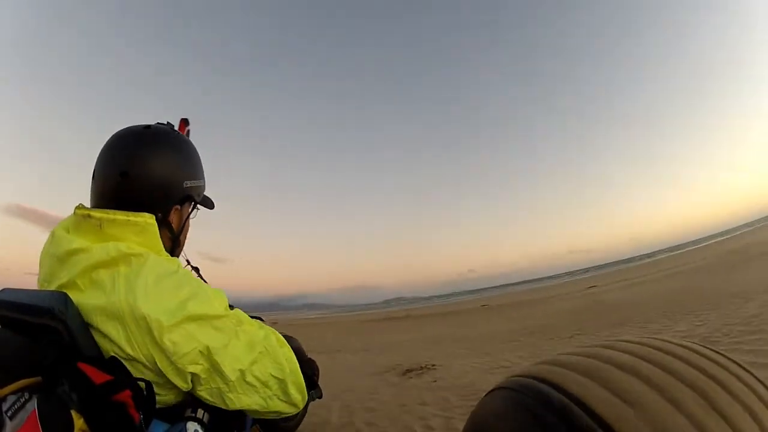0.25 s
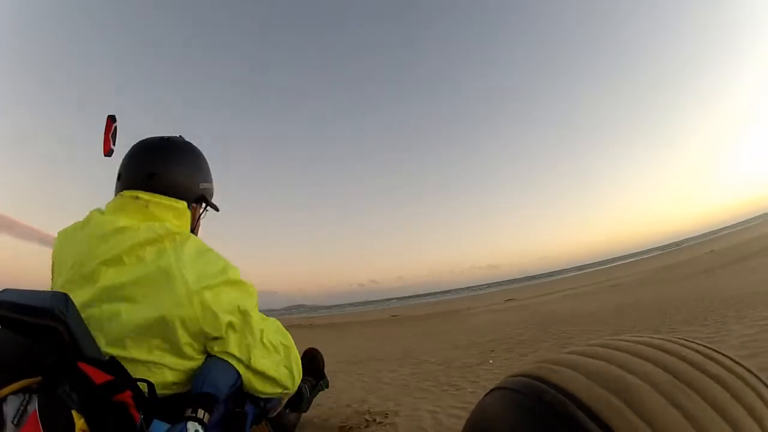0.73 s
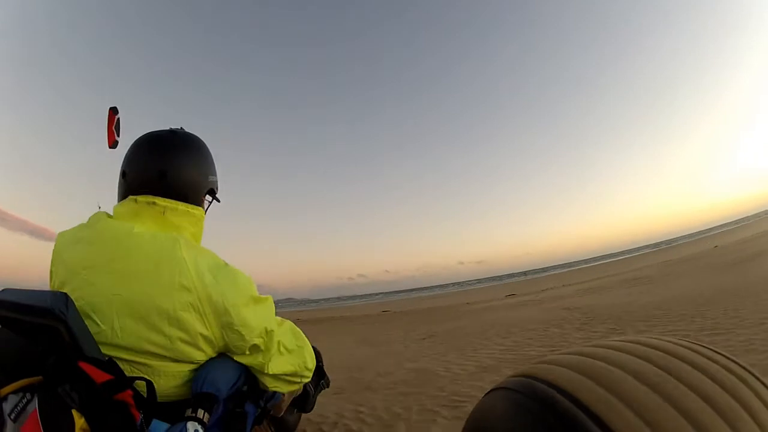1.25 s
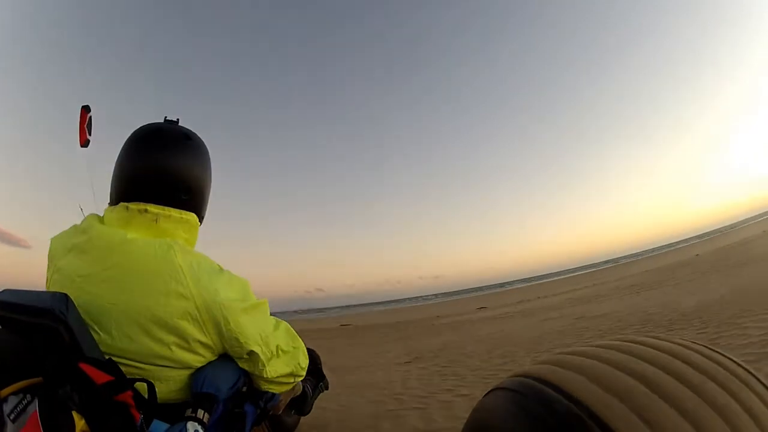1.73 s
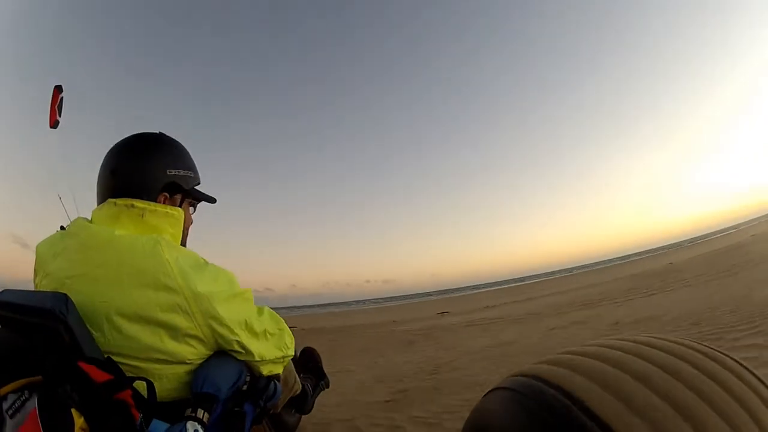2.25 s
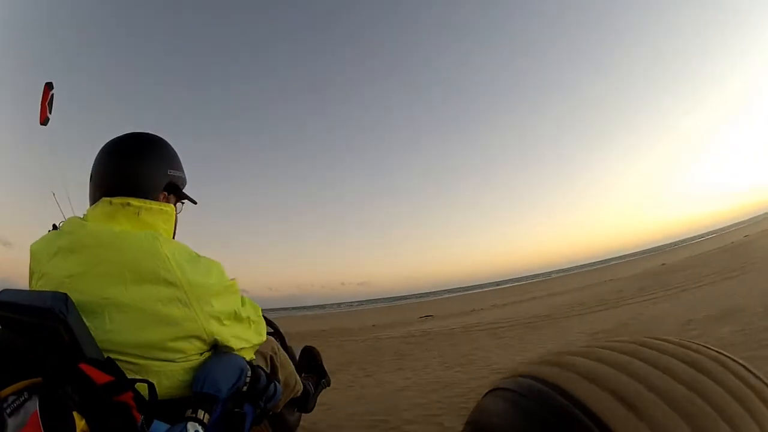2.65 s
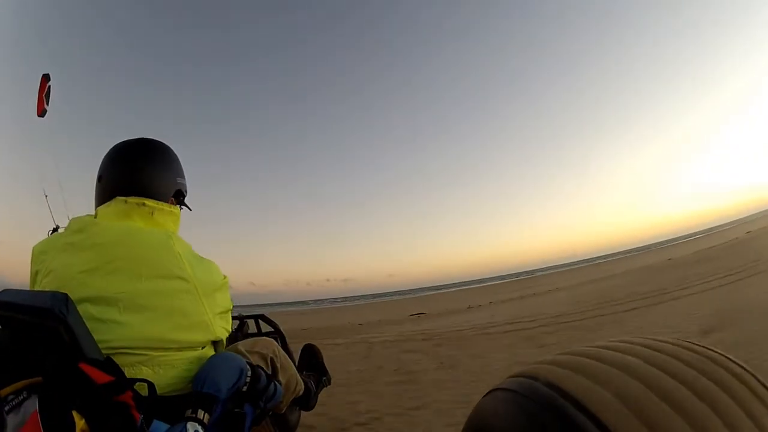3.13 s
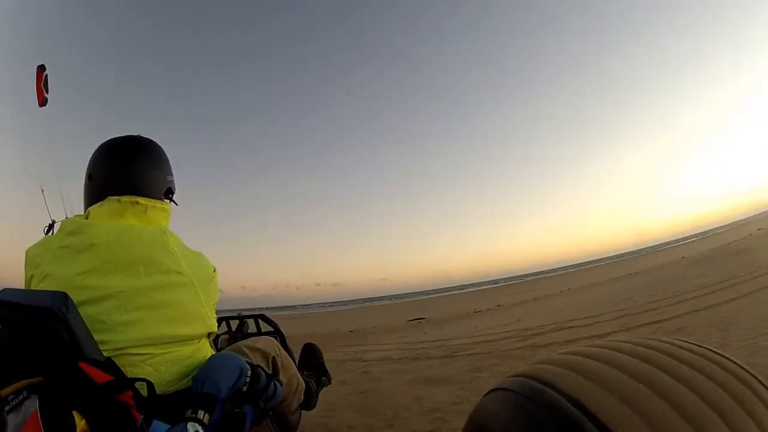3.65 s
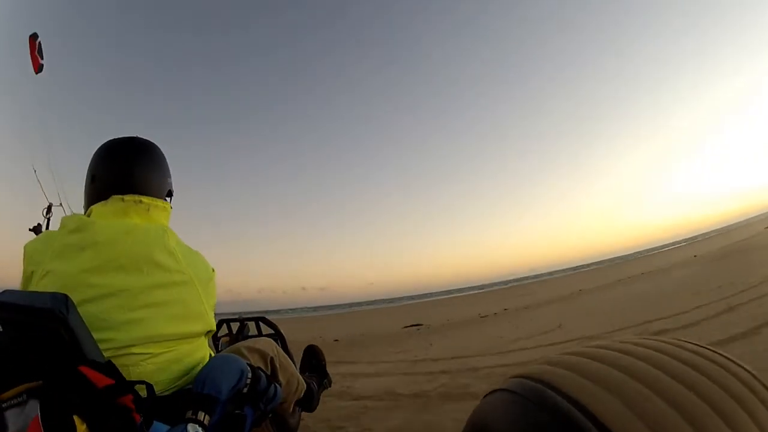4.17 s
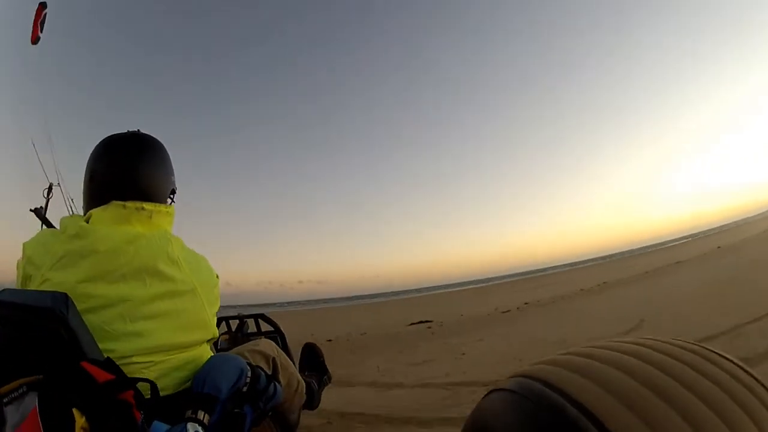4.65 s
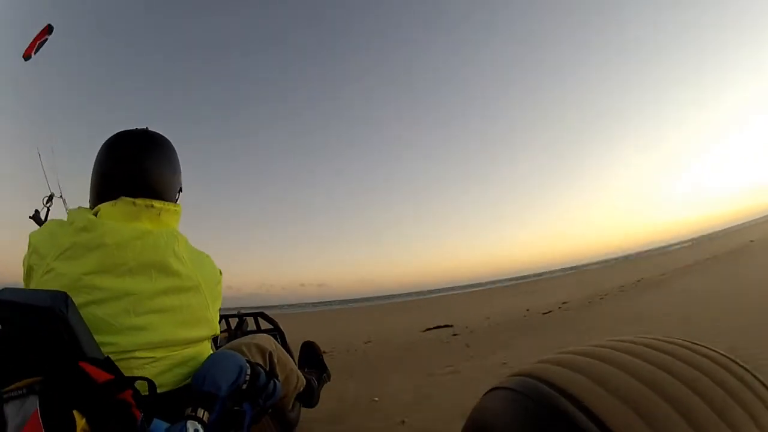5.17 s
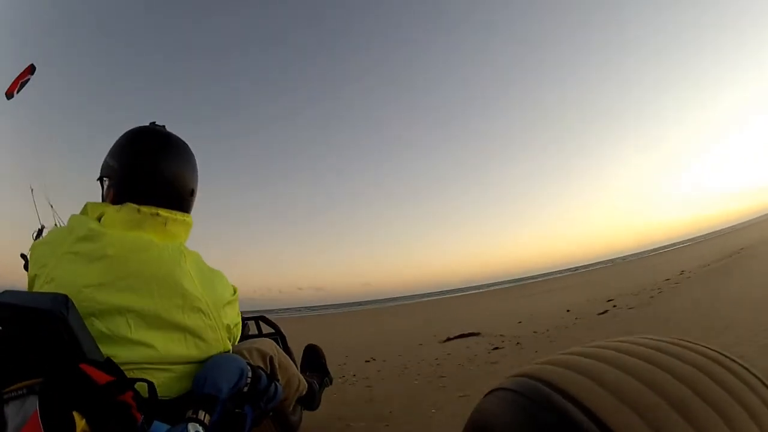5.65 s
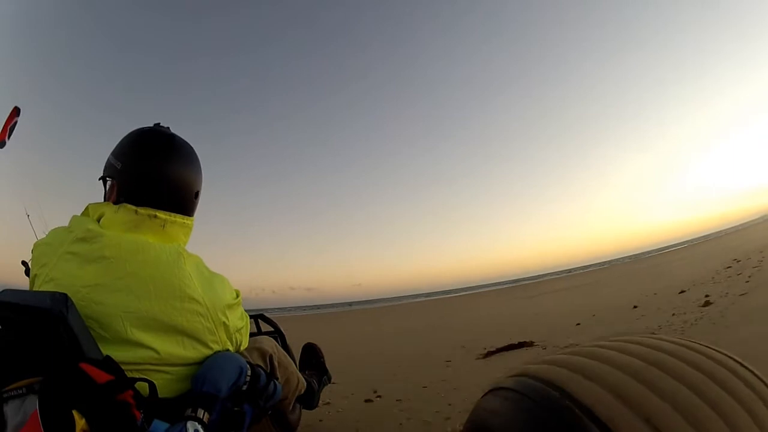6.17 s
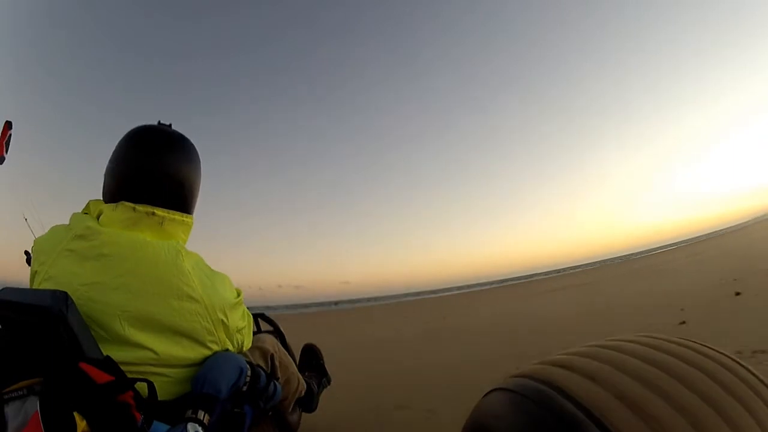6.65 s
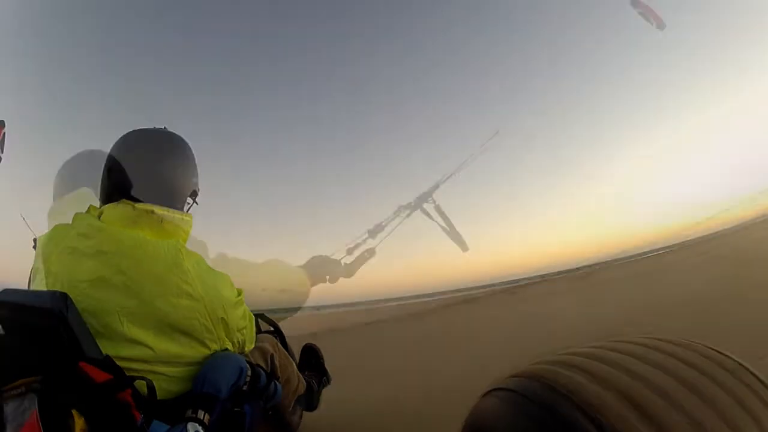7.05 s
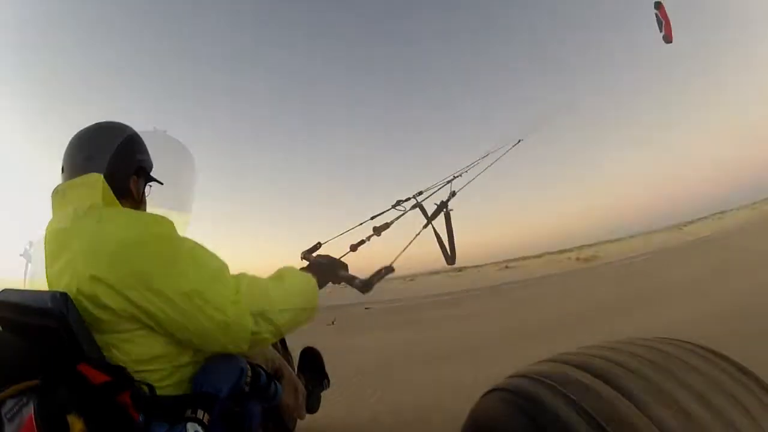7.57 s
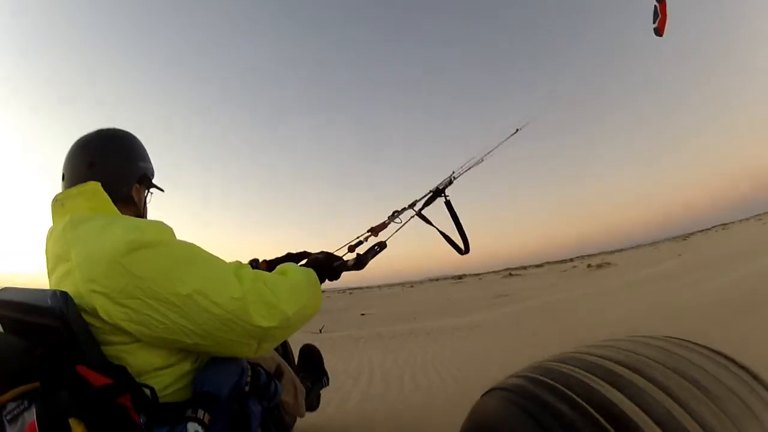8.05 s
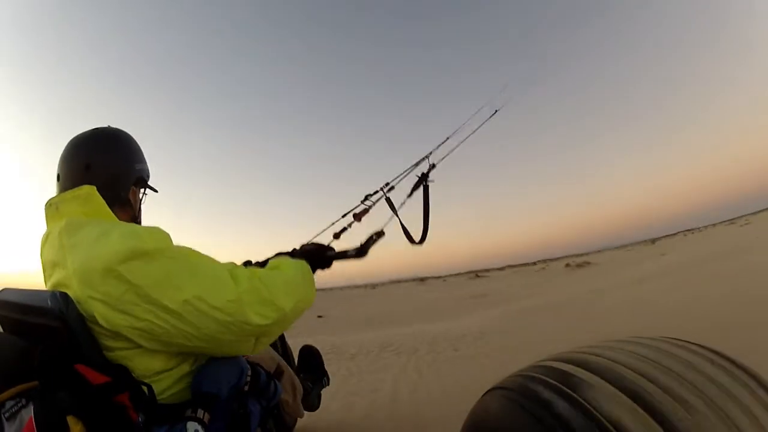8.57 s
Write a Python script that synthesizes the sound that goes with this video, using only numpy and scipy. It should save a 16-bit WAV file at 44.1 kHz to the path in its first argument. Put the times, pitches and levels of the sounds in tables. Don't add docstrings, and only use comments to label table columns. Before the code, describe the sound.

A wheeled buggy rolls fast on rippled hard sand at an open beach. An enclosed microphone on its frame hears its plastic shell chatter about fifty times a second, scraping at first, then slapping harder after four seconds. Beneath are deep wind and tyre rumble, a hollow frame drone, gritty sand hiss, low bumps and dull clamp knocks. The sound is close, dry, coarse and nearly mono.

```python
import sys
import numpy as np
from scipy import signal
from scipy.io import wavfile
from scipy.ndimage import uniform_filter1d

SR = 44100
rng = np.random.default_rng(int(sys.argv[2]) if len(sys.argv) > 2 else 0)


def wav_record(signal):
    frames = np.transpose(np.atleast_2d(signal))
    bounded = np.clip(frames, -1, 1)
    quanta = np.round(bounded * 32767).astype(np.int16)
    wavfile.write(sys.argv[1], SR, quanta)


def level_to_linear(level):
    exponent = np.asarray(level, float) / 20
    return 10 ** exponent


N = 388521


def evened(x):
    return x / np.sqrt(np.mean(x ** 2) + 1e-20)


def curve(rows):
    times, levels = np.transpose(rows)
    return np.interp(np.arange(N) / SR, times, levels)


def noise(points, patchy_db, size):
    frames, hz = 4 * N // size + 5, np.fft.rfftfreq(size, 1 / SR)
    real, imaginary, patches = rng.standard_normal((frames, len(hz), 3)).T
    patches = uniform_filter1d(patches, size=6, axis=0)
    patches = evened(uniform_filter1d(patches, size=5, axis=1))
    point_hz, point_db = np.transpose(points)
    colour_db = np.interp(np.log(hz + 1), np.log(point_hz + 1), point_db, left=-120, right=-120)
    spectra = (real + 1j * imaginary) * level_to_linear(colour_db[:, None] + patchy_db * patches)
    sound = signal.istft(spectra, nperseg=size, noverlap=3 * size // 4)[1]
    return evened(sound[:N])


def body(x, modes, sign):
    out = np.zeros(len(x))
    for k, (hz, width, db) in enumerate(modes):
        radius = np.exp(-np.pi * abs(width) / SR)
        poles = [1, -2 * radius * np.cos(2 * np.pi * hz / SR), radius ** 2]
        ringing = signal.lfilter([1, 0, -1], poles, x)
        out += sign ** k * level_to_linear(db) * (1 - radius) * ringing
    return out


def add(mix, s, sound):
    part = mix[max(round(s * SR), 0):][:len(sound)]
    part += sound[:len(part)]


# (time [s], level [dB])
RIDE = [(0, -34), (.55, -33.5), (1.15, -25.5), (1.85, -33.5), (2.5, -23.5), (3.5, -23.5), (3.72, -24.5),
        (4.0, -20.5), (4.5, -24), (6.4, -23), (6.95, -21), (7.3, -28), (7.85, -37), (8.0, -24.5),
        (8.35, -32.5), (8.55, -21.5), (8.68, -29.5), (8.81, -33)]
# (frequency [Hz], level [dB per Hz])
RUMBLE_COLOUR = [(7.1, -46), (14, 0), (43, 0), (91, -0.5), (400, -13.5), (520, -19.5), (880, -120)]


def rumble():
    return level_to_linear(curve(RIDE)) * noise(RUMBLE_COLOUR, patchy_db=1.5, size=4096)


# (time [s], level [dB])
SHAKE = [(0, -34), (.27, -28.5), (.4, -38), (.85, -33.5), (1.35, -37.5), (1.75, -34.5), (3.2, -40),
         (3.95, -35.5), (4.15, -30), (5.0, -31), (5.5, -35), (6.25, -28), (6.55, -32.5), (6.85, -28.5),
         (7.65, -35), (7.9, -29.5), (8.45, -30.5), (8.81, -30)]
# (frequency [Hz], level [dB per Hz])
DRONE_COLOUR = [(71, 1.5), (120, -7), (211, -6.5), (387, -11), (426, -8.5), (470, -8), (672, -11),
                (745, -17), (800, -27.5), (961, -28), (1130, -28), (1600, -99)]


def drone():
    level_db = -29.5 + 0.44 * (curve(RIDE) + 24.5) + 0.36 * (curve(SHAKE) + 33.5)
    return level_to_linear(level_db) * noise(DRONE_COLOUR, patchy_db=2.0, size=1024)


# (time [s], level [dB])
SAND = [
    (0.0, -54.5),
    (0.34, -53.5),
    (3.73, -50.5),
    (4.34, -47.5),
    (5.18, -47),
    (8.81, -49.5),
]
# (frequency [Hz], level [dB per Hz])
HISS_COLOUR = [(470, -15), (720, 2.5), (900, -2), (1600, -12), (2200, -7), (2490, -2.5), (2800, -15.5),
               (3850, -18.5), (4370, -51), (5160, -48), (5900, -34)]


def hiss():
    return level_to_linear(curve(SAND) + 2.0) * noise(HISS_COLOUR, patchy_db=4.5, size=256)


# (middle [s], length [s])
LULLS = [(.176, 0.024), (0.41, 0.023), (0.586, 0.038), (0.738, 0.042), (1.053, 0.011), (1.614, 0.044),
         (1.987, 0.042), (2.019, 0.023), (2.172, 0.017), (2.093, 0.012), (7.608, 0.0079), (3.821, 0.029),
         (4.215, 0.02), (4.994, 0.013), (5.387, 0.014), (5.567, .014), (5.693, 0.011), (5.746, 0.01),
         (6.339, .016), (7.087, 0.017), (7.995, 0.016), (8.159, .022), (8.733, 0.019)]


def contact():
    free = np.zeros(N)
    for s, length in LULLS:
        flat_topped = np.exp(-np.linspace(-2, 2, round(2 * length * SR)) ** 4)
        add(free, s - length, flat_topped)
    return level_to_linear(-13 * free)


# (frequency [Hz], width [Hz], level [dB])
WALL = [(1245, 590, -10.5), (2700, 370, -6.5), (3930, 345, -3.5), (4260, 1250, -8), (5150, 770, -1.5)]


def grit():
    bursts = evened(uniform_filter1d(rng.standard_normal(N), size=200))
    burst_db = 13.4 * np.tanh(1.06 * bursts)
    grains = rng.standard_normal(N) ** 3 * level_to_linear(burst_db)
    return level_to_linear(curve(SAND) - 2.5) * evened(body(contact() * grains, WALL, sign=-0.94))


# (time [s], level [dB], pitch [Hz])
BUMPS = [(1.249, -13, 64.7), (2.438, -16, 51.8), (2.949, -6.5, 66.7), (3.53, -9, 89), (3.998, -16, 62.8),
         (4.136, -7, 37.45), (4.519, -9, 61.9), (5.517, -13, 48.8), (5.988, -4, 51.7), (6.748, -9, 56.4),
         (6.931, -1.5, 68.4), (7.987, -8, 64.2), (8.079, -8, 78.8), (8.242, -5.5, 52.1), (8.46, -6.5, 85.5),
         (8.581, -4, 51.9), (8.772, -6, 81)]


def bumps():
    out, t = np.zeros(N), np.arange(4000) / SR
    swell = t / 0.013 * np.exp(1 - t / 0.0074)
    for s, blow_db, hz in BUMPS:
        add(out, s, -level_to_linear(blow_db - 1.5) * swell * np.sin(2 * np.pi * hz * t))
    return out


def ring(modes, t, detune):
    out = np.zeros(len(t))
    for (hz, db, t60), shift in zip(modes, detune):
        out += level_to_linear(db - 60 * t / t60) * np.sin(2 * np.pi * hz * shift * t)
    return out


# (time [s], level [dB], middle modes [dB above blow], top modes [dB above blow])
KNOCKS = [(0.271, -31, -3.5, 5), (1.265, -27.5, -11.5, -6), (1.346, -30.5, -7, -26),
          (1.546, -35.5, -5, -29), (1.978, -32.5, -8, -29), (2.05, -31, -8, -7), (2.302, -26.5, -13, -30),
          (3.68, -24, -15, -32.5), (3.762, -32.5, -5, -26), (4.263, -23.5, -5.5, -15), (4.69, -25, -7, -24),
          (4.813, -33.5, -8, 4), (4.86, -21.5, -10, -1.5), (5.097, -30, -6, 4.5), (5.113, -21, -5.5, -28),
          (5.189, -17.5, -8.5, -15), (5.331, -20.5, -1.5, -8), (5.846, -27, -14, -5),
          (6.185, -31, -15, -19), (6.625, -26.5, -10, -22), (6.802, -24.5, -13, -22), (6.905, -30, -8, -16),
          (6.986, -28, -21, -10), (7.054, -28, -10, -5), (7.294, -24.5, -16, -5.5), (7.832, -32, 2, 6.5),
          (8.045, -24.5, -23, -13), (8.083, -25.5, -19, -14), (8.454, -30.5, -13, -22),
          (8.495, -26.5, -18, -29)]
# (frequency [Hz], level [dB], decay t60 [s])
CLAMP_LOW = [(646, 6, 0.053), (490.1, -1, 0.05)]
CLAMP_MIDDLE = [(1098, 0, 0.046), (1350, -10.5, 0.043), (1017, -11, 0.05)]
CLAMP_TOP = [(1735, -10, 0.039), (2080, -7.5, 0.019)]


def knocks():
    out, t = np.zeros(N), np.arange(3000) / SR
    padded_start = np.sin(np.pi / 2 * np.minimum(t / 0.0017, 1)) ** 2
    for s, blow_db, middle_db, top_db in KNOCKS:
        detune = 1 + 0.018 * rng.standard_normal(7)
        tone = ring(CLAMP_LOW, t, detune)
        tone += level_to_linear(middle_db + 6.0) * ring(CLAMP_MIDDLE, t, detune[2:])
        tone += level_to_linear(top_db + 5.5) * ring(CLAMP_TOP, t, detune[5:])
        tone *= padded_start
        add(out, s, -level_to_linear(blow_db + 3) * tone)
        for k in range(3):
            late, louder = rng.standard_normal(2)
            rebound_db = blow_db - 13 - 4.4 * k + 3.0 * louder
            add(out, s + 0.005 * (k + 1) + 0.001566 * late, level_to_linear(rebound_db) * tone)
    return out


# (time [s], scrape level [dB], back plate glance level [dB])
SCRAPES = [(0.436, -28.5, -23), (0.535, -30.5, -40), (0.605, -27, -19.5), (0.654, -47, -22),
           (0.696, -39, -24), (0.757, -41, -15.5), (0.802, -35, -20.5), (0.8295, -30, -25),
           (0.955, -27.5, -24), (1.0303, -27.5, -28), (1.1657, -29, -33), (1.292, -31, -22),
           (1.451, -36, -32), (1.6322, -26, -20), (1.671, -29, -24.5), (1.7577, -30, -33),
           (1.8376, -36, -25.5), (1.9599, -23, -26), (2.109, -49, -46), (2.2444, -28, -38),
           (2.4046, -28, -31), (2.637, -29.5, -49), (2.8757, -30, -47), (3.0318, -32.5, -36),
           (3.3648, -27.5, -42), (3.666, -31, -22), (3.7246, -28.5, -40), (3.9002, -30.5, -33),
           (5.292, -25.5, -38), (5.458, -27.5, -34)]
# (time [s], level [dB])
SLAPS = [(0.186, -15.5), (0.219, -19), (0.255, -21.5), (4.0899, -21), (4.1644, -22.5), (4.4412, -17.5),
         (4.8406, -17), (5.6197, -18.5), (5.8304, -19.5), (6.11, -14.5), (6.1857, -16.5), (6.2248, -14),
         (6.2628, -14), (6.4915, -20), (6.8062, -13.5), (6.8849, -14.5), (6.9251, -20), (7.095, -19),
         (7.238, -19), (7.4139, -20.5), (7.8458, -16), (7.889, -16), (8.0441, -15), (8.2113, -18),
         (8.2519, -15.5), (8.2874, -17), (8.3687, -19), (8.4165, -13), (8.457, -11.5), (8.4966, -12)]
# (time [s], level [dB])
GLANCES = [(0.025, -22), (0.0836, -19), (0.154, -19.5), (0.8637, -23), (3.3112, -23), (4.2261, -19.5),
           (4.276, -16), (4.3481, -21.5), (4.4985, -16), (4.569, -21), (4.6469, -16), (4.7107, -15),
           (4.7535, -16.5), (4.9158, -17.5), (5.0032, -19.5), (5.177, -25), (5.7204, -16), (5.8482, -15),
           (5.9334, -17), (6.0063, -20.5), (6.388, -19), (6.551, -17.5), (6.627, -17), (6.8258, -10.5),
           (7.553, -23.5), (7.6837, -21.5), (7.9076, -14.5), (8.1303, -18), (8.6371, -16.5), (8.7174, -18)]


def swings():
    square_back_db, glancing_back_db = -10, -4
    marked = [(s, scrape_db, blow_db, glancing_back_db) for s, scrape_db, blow_db in SCRAPES]
    marked += [(s, db - 14.5, db, square_back_db) for s, db in SLAPS]
    marked += [(s, db - 10, db, glancing_back_db) for s, db in GLANCES]
    marked.sort()
    out, starts = list(marked), [row[0] for row in marked] + [N / SR]
    for s, next_s in zip(starts, starts[1:]):
        count = max(round((next_s - s) * 50), 1)
        for k in range(1, count):
            jitter, scrape_scatter, slap_scatter = rng.uniform(-np.sqrt(3), np.sqrt(3), 3)
            at = s + (next_s - s) * k / count + 0.0015 * jitter
            shake_db = np.interp(at, *np.transpose(SHAKE))
            scrape_db = shake_db + 3.5 * scrape_scatter
            slap_db = -27 + 1.84 * (shake_db + 32) + 3 * slap_scatter
            out.append((at, scrape_db, slap_db, glancing_back_db))
    return out


def bounce(draw, tick, grit, rise_s, fade_s, stop_s):
    t = np.arange(len(draw)) / SR
    contacts = draw * abs(draw) ** grit * np.minimum(t / rise_s, 1)
    contacts *= np.exp(-t / fade_s) / (1 + (t / stop_s) ** 8)
    contacts[0] -= tick
    return contacts


# (frequency [Hz], width [Hz], level [dB])
LID = [(1420, 280, -7), (3600, 400, -1), (2945, 190, 5), (5030, 330, 0), (680, 150, -6)]
BACK = [(1376, 83, -9), (2054, 220, -10), (2380, 140, -3), (2893, 120, 2.5), (700, 120, 4)]


def chatter():
    lid, back, wall = np.zeros((3, N))
    for s, scrape_db, blow_db, back_db in swings():
        stay_s = 0.0095 * level_to_linear(0.9 * rng.standard_normal())
        scrape = bounce(rng.standard_normal(900), tick=0.32, grit=0.34,
                        rise_s=0.00038, fade_s=stay_s, stop_s=stay_s)
        add(wall, s + 0.0007, level_to_linear(scrape_db) * scrape)
        back_share = min(level_to_linear(back_db + 2), 1)
        lid_share = max(1 - back_share ** 2, 0.05)
        add(lid, s + 0.000976, -level_to_linear([blow_db]) * lid_share)
        glance = bounce(rng.standard_normal(500), tick=5.2, grit=0.29,
                        rise_s=0.0015, fade_s=0.0027, stop_s=0.0067)
        add(back, s + 0.000715, level_to_linear(blow_db) * back_share * glance)
    lid, back, wall = contact() * [lid, back, wall]
    lid_sound = body(level_to_linear(27.5) * lid, LID, sign=-0.86)
    back_sound = body(level_to_linear(13.5) * back, BACK, sign=-0.85)
    wall_sound = body(level_to_linear(10) * wall, WALL, sign=-0.88)
    return lid_sound + back_sound + wall_sound


def scene():
    rolling = rumble() + drone() + hiss() + grit()
    return np.tile(rolling + bumps() + knocks() + chatter(), (2, 1))


def top_cut(x):
    return signal.sosfilt(signal.butter(12, 16650, fs=SR, output="sos"), x)


def record(dry):
    slow_edge = signal.firwin(161, 5798, window=("kaiser", 5.5), fs=SR)
    dull = signal.oaconvolve(dry, slow_edge[None], "same")
    slow = signal.resample_poly(dull, 40, 147, axis=1)
    slow = slow + level_to_linear(-69) * rng.standard_normal(slow.shape[1])
    held = np.repeat(slow, 4, axis=1)
    held = signal.resample_poly(held, 147, 160, axis=1)[:, :N]
    top_edge = signal.firwin(81, 15140, window=("kaiser", 8), fs=SR)
    held = signal.oaconvolve(held, top_edge[None], "same")
    smear = evened(rng.standard_normal(3600)) / 60
    apart = level_to_linear(-47.5) * signal.oaconvolve(held[0], smear)[:N]
    return top_cut(held + [apart, -apart])


dry = scene()
out = record(dry)
wav_record(out)
```